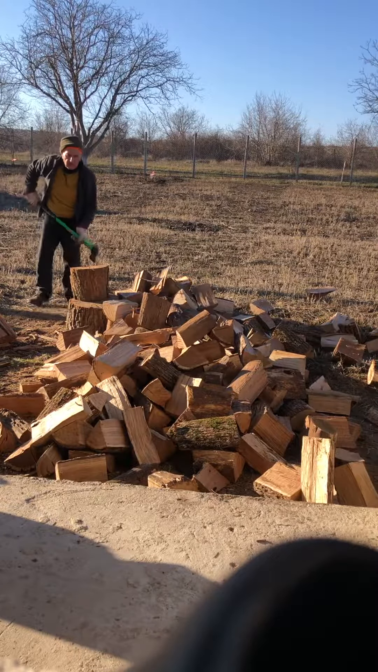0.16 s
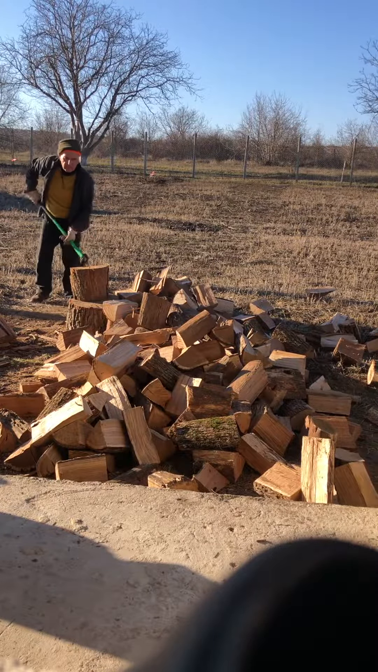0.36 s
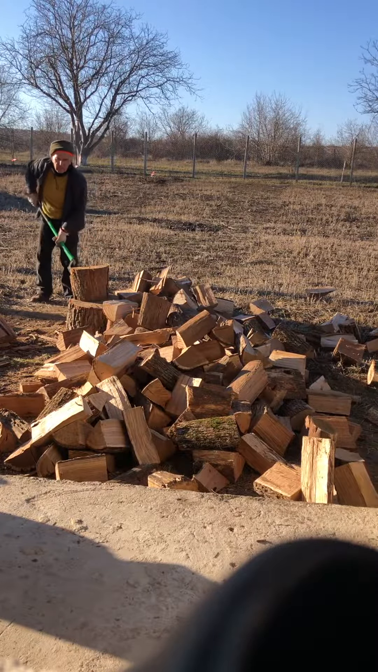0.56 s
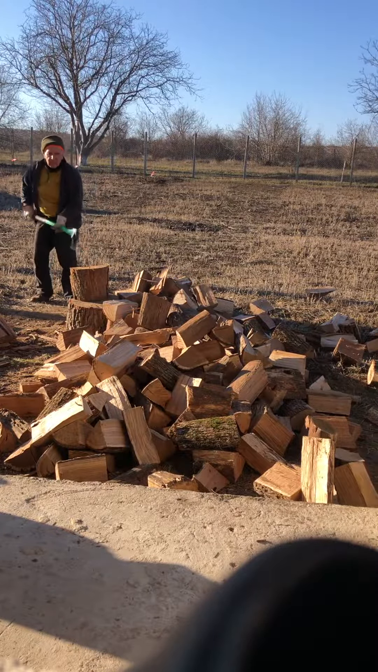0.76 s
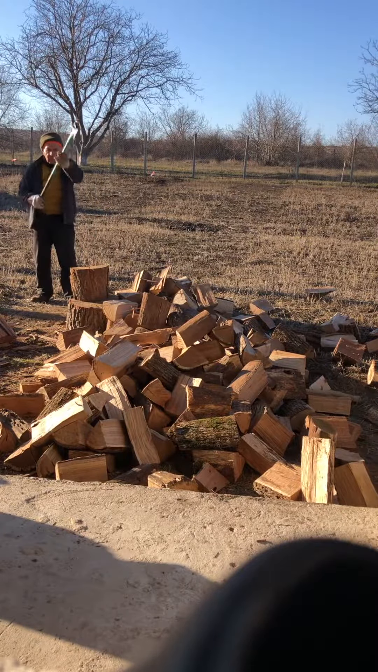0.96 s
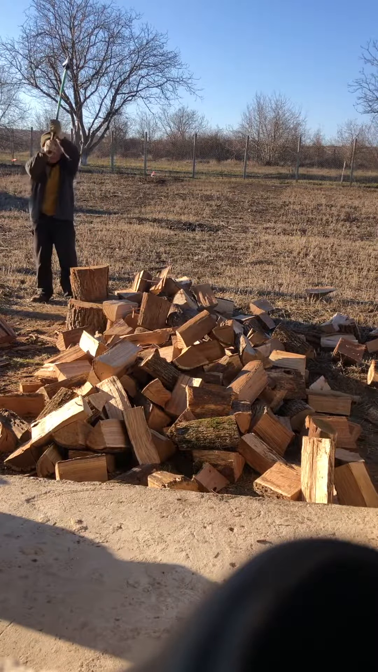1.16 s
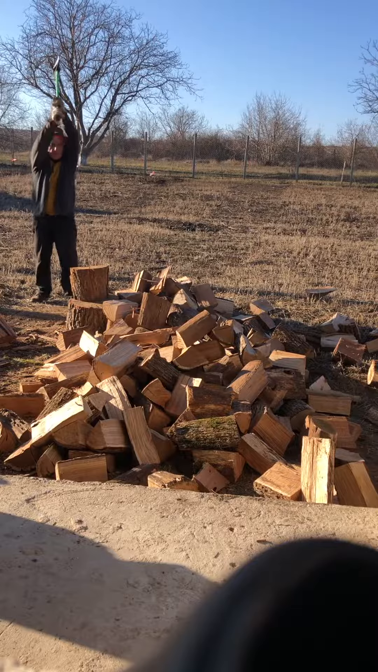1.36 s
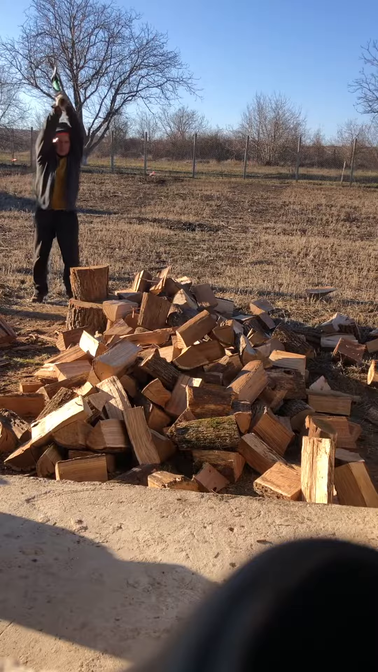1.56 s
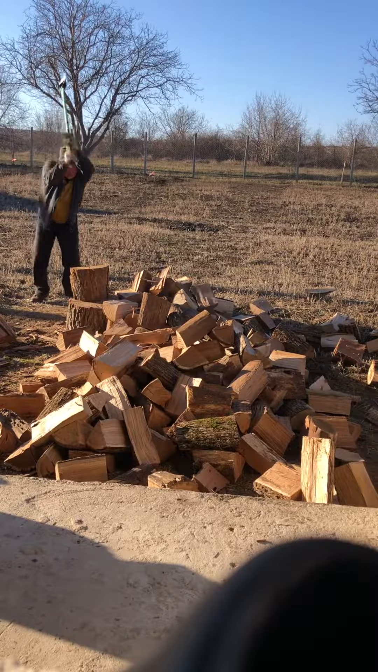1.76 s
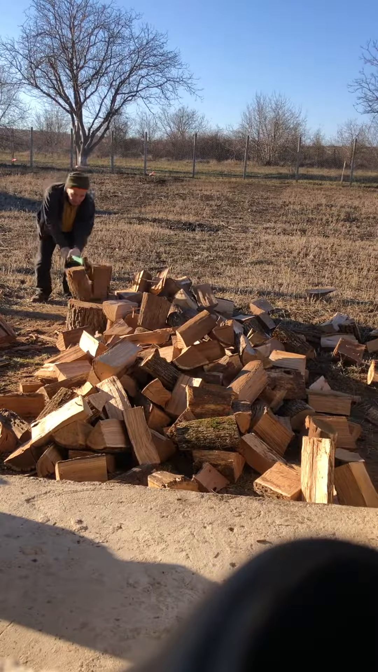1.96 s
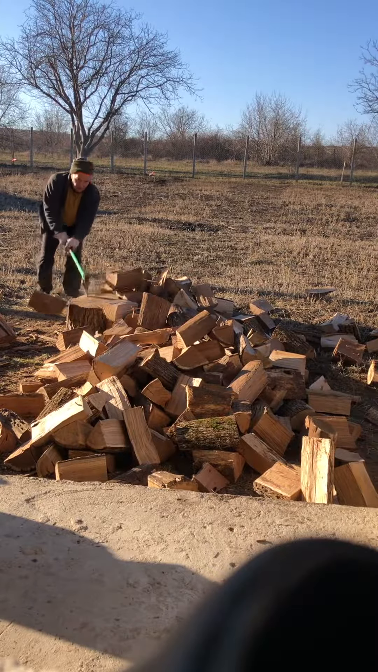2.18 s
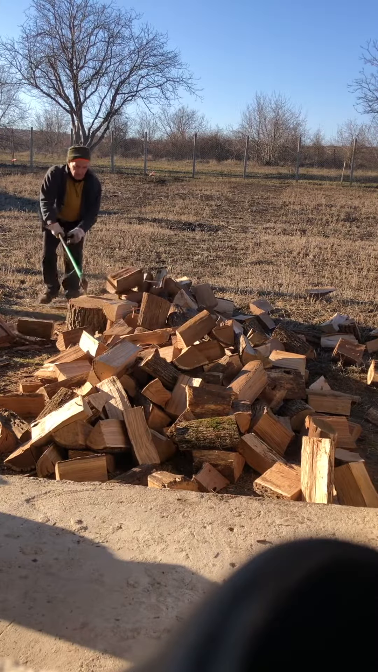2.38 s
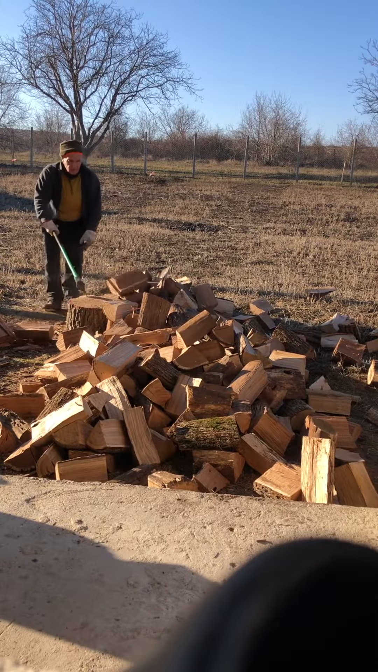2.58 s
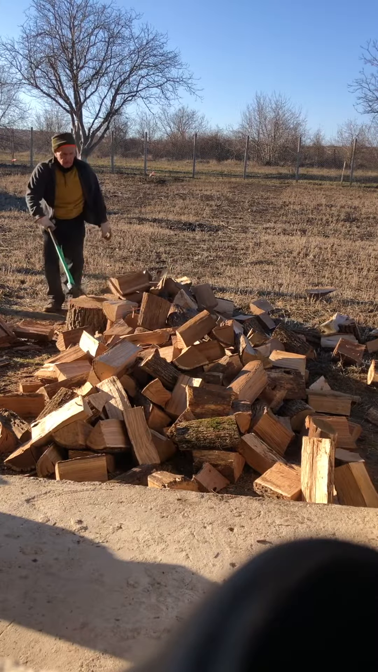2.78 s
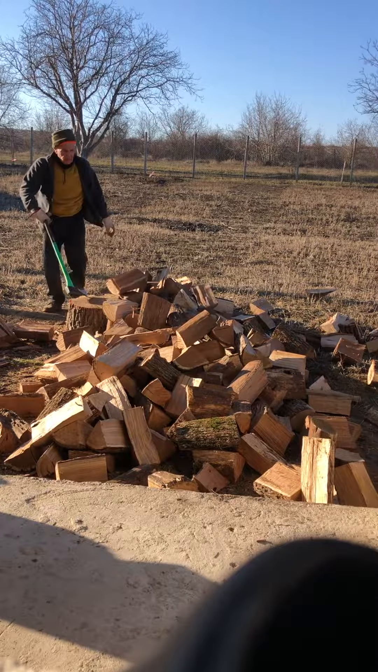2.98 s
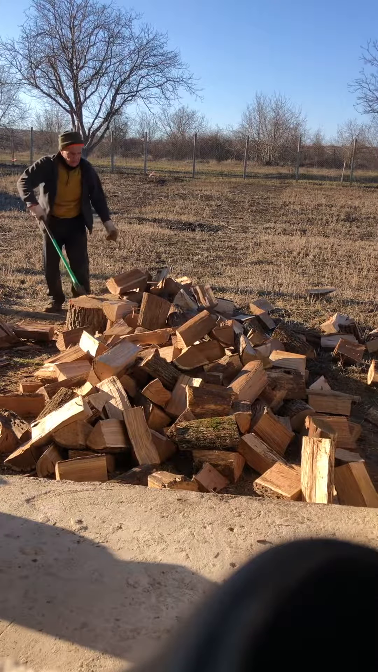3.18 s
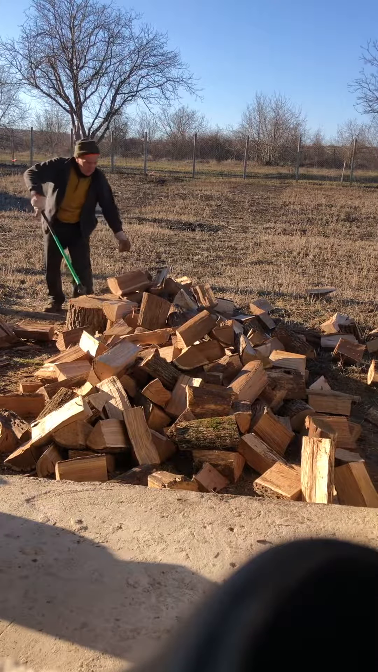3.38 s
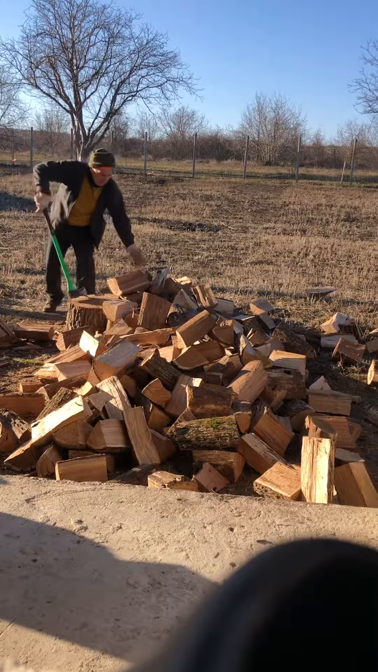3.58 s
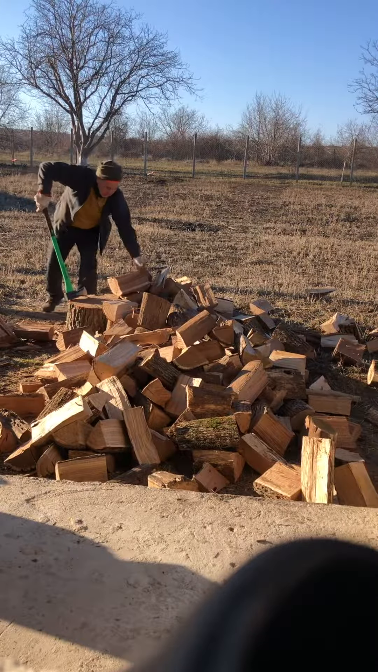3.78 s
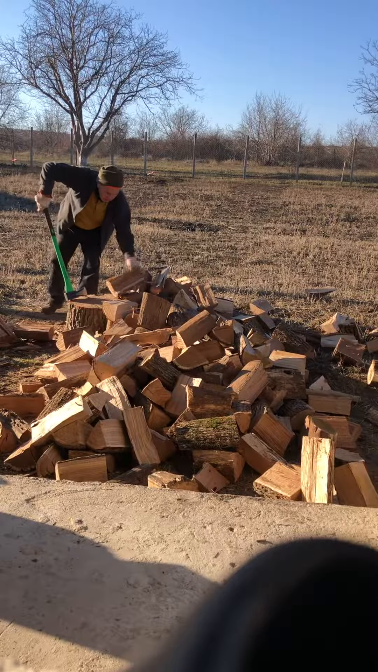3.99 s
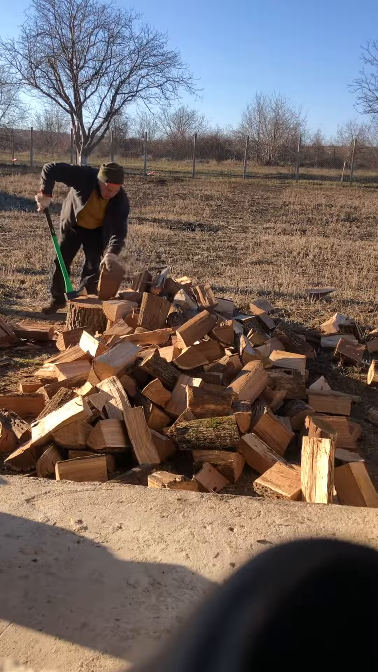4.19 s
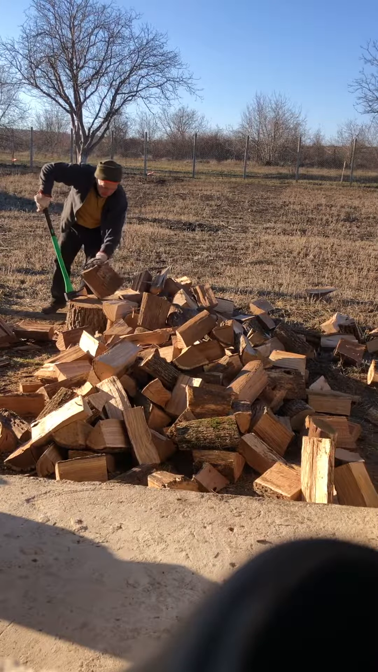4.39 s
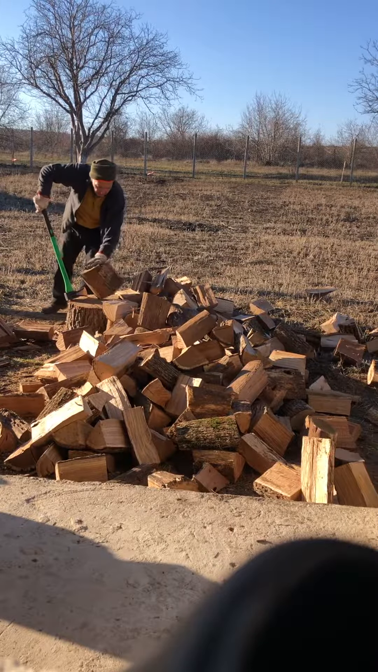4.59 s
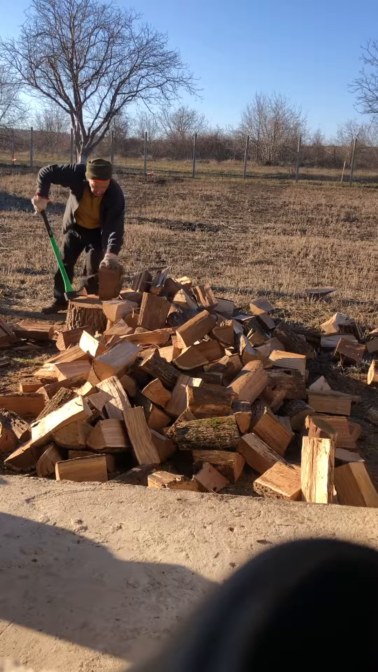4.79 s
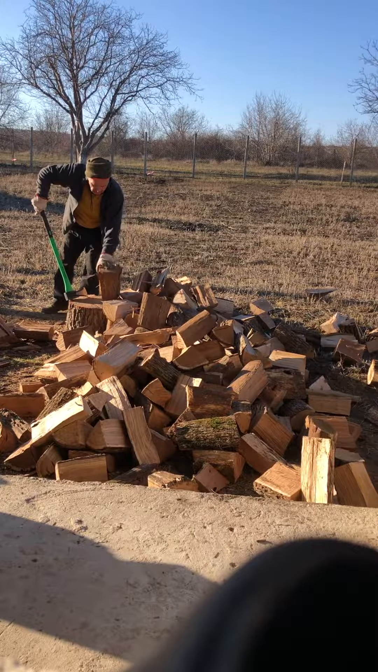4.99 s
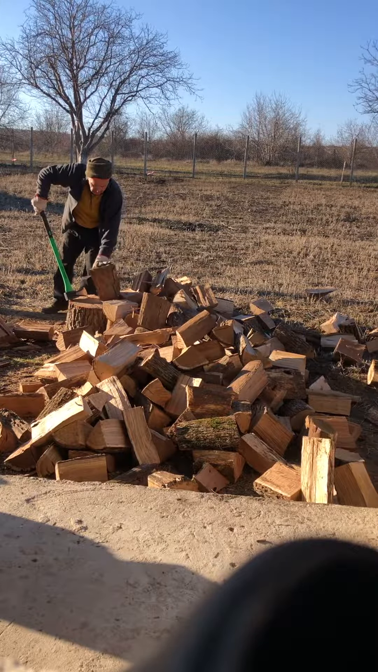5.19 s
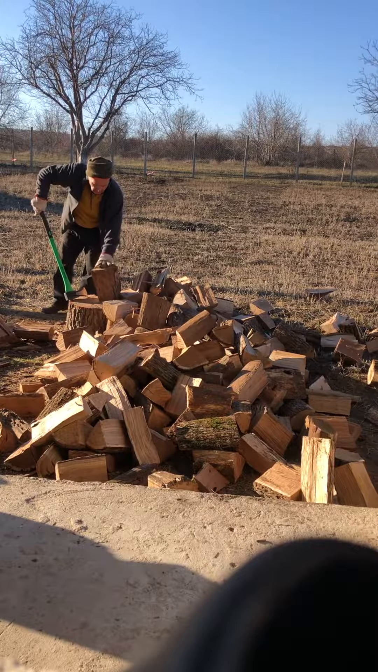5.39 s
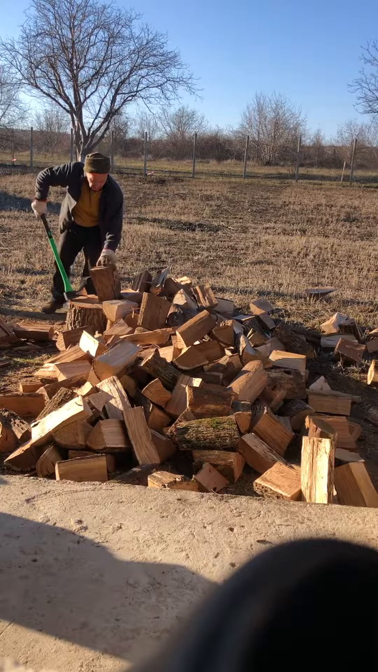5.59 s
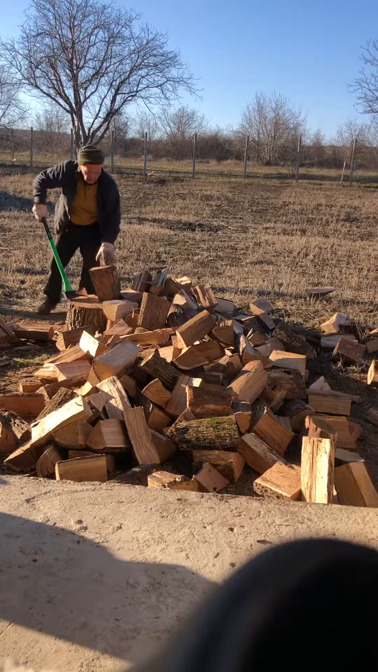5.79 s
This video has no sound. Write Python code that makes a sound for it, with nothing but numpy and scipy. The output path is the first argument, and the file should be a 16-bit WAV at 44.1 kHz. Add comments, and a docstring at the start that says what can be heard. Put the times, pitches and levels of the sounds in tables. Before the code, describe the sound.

An axe splits a log with one sharp, tearing crack in an open field; pieces tumble onto a woodpile amid faint wind and sparrows.

```python
"""Splitting a log in an open field

An axe cracks a log on a chopping block: noise burst, block modes and a storm of fibre snaps with a noise tail.
The halves tumble onto the woodpile as snaps, wood modes and low thumps; chips rattle and splinters tick.
Wind buffets the microphone and a far road hums, both coloured noise; sparrows chirp as sliding sines.
A jacket swishes in swells of noise; the axe head sings in narrow noise bands as it drags over the log."""
import sys
import numpy as np
from scipy import signal
from scipy.io import wavfile

SR = 44100
rng = np.random.default_rng(int(sys.argv[2]) if len(sys.argv) > 2 else 0)


def output_pcm(signal):
    """Save a mono or channel-first signal as 16-bit PCM at the path in sys.argv[1].

    Samples are clipped to [-1, 1] before scaling.
    """
    pcm = np.clip(np.atleast_2d(signal).T, -1, 1) * 32767
    wavfile.write(sys.argv[1], SR, np.round(pcm).astype(np.int16))


N = 257984


def amp(db):
    """Decibels to gain."""
    return 10 ** (np.asarray(db) / 20)


def rms_one(x):
    """Scale to unit rms."""
    return x / np.sqrt(np.mean(x ** 2) + 1e-20)


def at_hz(rows, hz):
    """All columns of a table read on a log-frequency axis."""
    f, *columns = np.transpose(rows)
    return [np.interp(np.log(hz), np.log(f), c) for c in columns]


def level(rows):
    """Gain over time from (s, dB) rows, silent outside them."""
    s, db = np.array(rows)[:, [0, -1]].T
    return amp(np.interp(np.arange(N) / SR, s, db, left=-200, right=-200))


def drift(rate_hz):
    """Slow chance of rms 1: noise through two equal poles, computed every 40 samples."""
    r = np.exp(-80 * np.pi * rate_hz / SR)
    noise = rng.standard_normal(N // 40 + 2002)
    slow = signal.lfilter([1], [1, -2 * r, r * r], noise)[2000:]  # skip the run-in
    return np.interp(np.arange(N) / 40, np.arange(len(slow)), rms_one(slow))


def band(x, low_hz, high_hz):
    """Butterworth band-pass."""
    sos = signal.butter(2, [low_hz, min(high_hz, .47 * SR)], "band", fs=SR, output="sos")
    return signal.sosfilt(sos, x)


def ring(clicks, hz, t60_s):
    """Two-pole resonator: a unit click sets a sine of height 1 ringing."""
    r, w = amp(-60 / (t60_s * SR)), 2 * np.pi * hz / SR
    return signal.lfilter([0, np.sin(w)], [1, -2 * r * np.cos(w), r * r], clicks + 1e-18)


def add(out, s, x):
    """Mix x into out from time s."""
    i = round(s * SR)
    out[i:i + len(x)] += x[:N - i]


def coloured(colour, tones, together_db, own_db, rate_hz):
    """Half-octave noise bands that flicker, scaled to rms 1, plus narrow resonant bands."""
    out, shared, white = 0, drift(rate_hz), rng.standard_normal((2, N))
    lowest_hz, highest_hz = colour[0][0], colour[-1][0]
    edges = lowest_hz * 2 ** np.arange(0, np.log2(highest_hz / lowest_hz) + .5, .5)
    for k, (low, high) in enumerate(zip(edges, edges[1:])):
        db = at_hz(colour, np.sqrt(low * high))[0] + together_db * shared + own_db * drift(rate_hz)
        out = out + amp(db) * band(white[k % 2], low, high)
    out = rms_one(out)
    for hz, width, db in tones:
        tone = rms_one(band(white[0], hz - width / 2, hz + width / 2))
        out = out + amp(db + 2 * drift(0.86)) * tone
    return out


# Far road and field. Each row: time in seconds, level in dB.
ROAD = [(0, -69), (3.0, -66), (5.85, -66.5)]
# Hum spectrum. Each row: frequency in Hz, density in dB per Hz.
ROAD_COLOUR = [(200, -3.5), (350, -4), (570, -0.5), (1080, -3), (1250, -9.5), (3600, -16.5), (16000, -28)]
# Resonant bands in the hum. Each row: centre in Hz, width in Hz, mean level in dB against the hum.
ROAD_DRONES = [(532, 94, -10), (737, 12, -8), (920, 170, -13), (1086, 16, -11), (1760, 250, -15.5)]


def road():
    """Steady broadband hum with narrow bands that slowly waver."""
    return level(ROAD) * coloured(ROAD_COLOUR, ROAD_DRONES, together_db=0.24, own_db=0.5, rate_hz=5.0)


# Gusts at the microphone. Each row: time in seconds, rumble level in dB before the lumps.
WIND = [(0, -60), (.28, -68), (.34, -52), (.55, -44.5), (.67, -63), (.76, -45), (1.12, -52.5),
        (1.36, -63.5), (1.62, -48), (1.8, -62.5), (2.75, -61.5), (3.4, -58), (3.72, -56.5), (3.9, -64),
        (4.1, -49.5), (4.53, -61.5), (4.9, -54.5), (5.85, -61.5)]
# Rumble spectrum. Each row: frequency in Hz, density in dB per Hz.
GUST_COLOUR = [(30, -4.5), (55, 10), (100, 2.5), (200, -11), (400, -32)]
LUMPS_DB, LUMPS_RATE_HZ = 4.0, 7.0  # random lumps within a gust


def wind():
    """Lumpy eddies at the microphone; strong gusts reach higher in pitch."""
    gain = level(WIND) * amp(LUMPS_DB * drift(LUMPS_RATE_HZ))
    rumble = coloured(GUST_COLOUR, [], together_db=3.0, own_db=0.5, rate_hz=59.0)
    pops = rms_one(band(rng.standard_normal(N), 87, 308)) * amp(1.7 * drift(18.67))
    return gain * rumble + gain ** 2 * amp(31.5) * pops


# Arched chirps. Each row: time of the top in seconds, rise in s, fall in s, top in Hz, level in dB.
CHIRPS = [ (1.575, 0.027, 0.015, 3870, -71), (1.9, 0.048, 0.074, 4080, -73), (2.868, .03, 0.033, 4530, -73),
          (2.935, 0.028, 0.029, 3750, -73), (3.055, 0.014, 0.025, 4200, -77.5),
          (3.445, 0.026, 0.034, 4730, -75.5), (3.505, 0.018, 0.027, 3565, -64.5),
          (3.601, 0.002, 0.026, 3300, -72), (3.668, 0.027, 0.027, 3350, -68.5),
          (3.845, .02, 0.025, 3500, -72.5), (3.91, 0.022, 0.041, 5150, -76.5),
          (3.965, 0.015, 0.017, 3660, -70), (4.005, 0.022, 0.035, 3950, -68.5),
          (4.367, 0.0093, .025, 3500, -67.5), (4.62, 0.008, 0.022, 3420, -76),
          (4.804, .012, 0.033, 3590, -70.5), (4.855, 0.018, 0.024, 3300, -71.5),
          (5.255, .003, 0.021, 3780, -68), (5.59, .025, 0.023, 4670, -73), (5.77, 0.0095, 0.023, 3330, -72)]
# Flatter, slurred notes. Each row: time of the top in seconds, rise in s, fall in s, top in Hz, level in dB.
SLURS = [(.065, .005, .05, 3850, -76), (.725, .008, .055, 3900, -75), (1.48, 0.014, 0.034, 4800, -75.5),
         (1.52, 0.0054, 0.026, 4420, -73), (1.585, 0.024, 0.029, 3310, -68.5),
         (1.805, .004, 0.026, 5200, -79), (1.812, 0.0029, 0.033, 4600, -76), (2.9, 0.0093, .022, 4450, -72),
         (2.965, 0.0128, .028, 4340, -75.5), (4.27, .04, .015, 4650, -77.5), (4.3, .035, 0.027, 2850, -71),
         (4.455, .01, .02, 4240, -77)]
RISE_HZ_PER_S, FALL_HZ_PER_S, SLUR_HZ_PER_S = 26000, 44000, 18000
TURN_S = 0.005  # rounding of the top
FAR_FLOCK_DB = -82
TREES_DB, TREES_T60_S = -5, .18


def sparrows():
    """Arched, ragged sine chirps smeared by the trees; a farther flock calls at random."""
    # time, rise, fall, top
    draw = rng.random((110, 4)) * [N / SR - .1, .02, .02, 1100] + [.05, .003, .015, 2900]
    far = [(*row, FAR_FLOCK_DB) for row in draw]
    notes = [(*row, RISE_HZ_PER_S, FALL_HZ_PER_S) for row in CHIRPS + far]
    notes += [(*row, SLUR_HZ_PER_S, SLUR_HZ_PER_S) for row in SLURS]
    out, warble = np.zeros(N), 1 + .012 * drift(70)
    for s, rise, fall, top_hz, db, up, down in notes:
        t = np.arange(-rise * SR, fall * SR) / SR
        hz = top_hz - np.where(t < 0, up, down) * (np.hypot(t, TURN_S) - TURN_S)
        hz = hz * np.roll(warble, -round(s * SR))[:len(t)]
        tone = np.sin(2 * np.pi * np.cumsum(hz) / SR)
        add(out, s - rise, np.sqrt(2) * amp(db) * tone * signal.windows.tukey(len(t), .4))
    ragged = out * amp(3.5 * drift(150))
    t = np.arange(SR // 4) / SR
    scatter = rng.standard_normal(len(t)) * amp(-60 * t / TREES_T60_S)
    smear = signal.fftconvolve(ragged, scatter / np.linalg.norm(scatter))[:N]
    return ragged + amp(TREES_DB) * smear


# Jacket and hands sliding. Each row: time of the loudest point in seconds, swell in s, fade in s, level in dB.
SWISH = [(.36, 0.38, 0.25, -60), (1.181, .19, 0.042, -61.5), (5.65, 0.29, 0.077, -69)]
# Cloth spectrum. Each row: frequency in Hz, density in dB per Hz.
SWISH_COLOUR = [(700, 2), (1600, 5), (2500, -6), (3500, 2.5), (5400, -1), (8500, -7), (16000, -16.5)]
SWISH_SWELL_DB, SWISH_FADE_DB = 13.5, 9.5  # gained over the swell, lost over the fade
SWISH_STOP_S = 0.066  # last drop after the fade


def swish():
    """Each stroke of cloth noise swells to its loudest point, fades and stops."""
    cloth = coloured(SWISH_COLOUR, [], together_db=0.0, own_db=2.0, rate_hz=20.0)
    gain = 0
    for s, swell, fade, db in SWISH:
        end = s + fade
        gain = gain + level([(s - swell, db - SWISH_SWELL_DB), (s, db),
                             (end, db - SWISH_FADE_DB), (end + SWISH_STOP_S, db - 32)])
    return gain * cloth


# Modes of the axe head. Each row: centre in Hz, width in Hz, level in dB.
STEEL = [(4970, 270, 2), (6010, 140, 0), (11600, 500, -10)]
# Drag over the log. Each row: time in seconds, gain in dB.
DRAG = [(.25, -88), (.31, -69.5), (.45, -72.5), (.63, -84)]


def drag():
    """Friction keeps a few modes of the axe head ringing: narrow bands of one noise."""
    white, sound = rng.standard_normal(N), 0
    for hz, width, db in STEEL:
        sound = sound + amp(db) * rms_one(band(white, hz - width / 2, hz + width / 2))
    return level(DRAG) * sound


# Dry ticks of splinters, bark and grass. Each row: start in seconds, level in dB before the band-pass.
TICKS = [(0.7374, -63), (0.813, -61), (1.3365, -53.5), (2.029, -17), (2.034, -25), (3.6849, -62.5),
         (4.0725, -57.5), (4.9215, -58), (5.2497, -58.5), (5.5507, -55.5)]
# Short thin rings. Each row: start in seconds, frequency in Hz, level in dB, t60 in s.
PINGS = [(1.891, 11010, -52.5, 0.077), (5.165, 4530, -61.5, 0.092)]


def ticks():
    """Brief bursts of treble noise and two short decaying sines."""
    out, t = np.zeros(N), np.arange(SR // 5) / SR
    for s, db in TICKS:
        burst = rng.standard_normal(len(t)) * amp(-60 * t / 0.025)
        add(out, s, amp(db) * band(burst, 2300, 8300))
    for s, hz, db, t60 in PINGS:
        attack = np.minimum(500 * t, 1)
        add(out, s, attack * amp(db - 60 * t / t60) * np.sin(2 * np.pi * hz * t))
    return out


RATTLE_FROM_S, RATTLE_T60_S, RATTLE_PER_S, RATTLE_DB = 2.17, 1.1, 140, -54


def rattle():
    """Loose bark and chips tick at random, as noise puffs, while the pile settles."""
    t = np.arange(SR) / SR
    heights = amp(2.7 * np.minimum(rng.exponential(1, SR), 4))
    chips = (rng.random(SR) < RATTLE_PER_S / SR) * heights
    decay = amp(-60 / (0.062 * SR))  # puff t60 0.062 s
    puffs = signal.lfilter([1], [1, -decay], chips + 1e-18) * rng.standard_normal(SR)
    out = np.zeros(N)
    add(out, RATTLE_FROM_S, amp(RATTLE_DB - 60 * t / RATTLE_T60_S) * rms_one(band(puffs, 1150, 8540)))
    return out


# Modes of a piece of firewood. Each row: frequency in Hz, mean level in dB, t60 in s at damping 1.
BILLET = [(235.7, -11, 0.056), (364.3, -10.5, 0.088), (496, -7.5, .08), (565, 0, .11), (628, -9, .07),
          (745, -11.5, 0.1), (900, -10.5, 0.053), (1060, -11, .07), (2034, -12.5, .04)]


def wood(push, damping=1):
    """The modes of a piece of firewood, each struck with its own random strength."""
    strengths_db = rng.normal(0, 2.6, len(BILLET))
    return sum(amp(db + k) * ring(push, hz, t60 / damping) for (hz, db, t60), k in zip(BILLET, strengths_db))


# Wood on wood. Each row: start in seconds, snap level in dB before the band-pass, drive of the ring in dB.
KNOCKS = [(2.179, -23, -57), (2.2073, -36, -45), (2.3055, -23.5, -18.5), (2.3814, -44.5, -40),
          (2.4424, -46, -51), (2.4585, -50, -48.5), (2.5145, -39.5, -40), (2.584, -46, -54),
          (3.2994, -50.5, -71), (5.165, -54.5, -62), (5.6388, -38.5, -58.5)]
# Dull low thumps, loudest where the halves land. Each row: start in seconds, starting level in dB, pitch in Hz.
THUMPS = [(0.46, -39, 266), (0.816, -40.5, 142), (2.329, -25, 94), (2.387, -30, 247), (2.638, -45, 170),
          (2.837, -46, 215), (3.564, -49.5, 226), (4.219, -50.5, 236), (4.791, -48.5, 228),
          (4.901, -43, 231.3), (5.164, -45.5, 240), (5.302, -43.5, 237.3), (5.799, -48.5, 221)]
THUMP_T60_S = 0.064
SNAP_TREBLE_DB = -12  # against its middle
SETTLE_S, SETTLE_DB = 0.033, -4  # chatter after landing: time constant, level before its band-pass


def knocks():
    """Each contact is a dry snap with a rustle of bark and a soft push into the modes of the piece that lands."""
    out, t = np.zeros(N), np.arange(SR // 3) / SR
    for s, snap_db, ring_db in KNOCKS:
        noise = rng.standard_normal(len(t))
        middle = amp(snap_db) * band(noise, 800, 5000)
        treble = amp(snap_db + SNAP_TREBLE_DB) * band(noise, 5000, 17000)
        decay = amp(-60 * t / 0.025) + amp(-11.5 - 60 * t / 0.19)  # snap, then rustle
        snap = (middle + treble) * decay * np.minimum(t / 0.00078, 1)
        push = np.exp(-((t - .003) / 0.00015) ** 2)  # the full weight follows the first touch
        push = push / (0.00031 * SR * np.sqrt(np.pi))  # area about a half
        chatter = rng.standard_normal(len(t)) * np.exp(-t / SETTLE_S) * (t > .003)
        push = push + amp(SETTLE_DB) * band(chatter / np.linalg.norm(chatter), 280, 1700)
        add(out, s, snap + amp(ring_db) * wood(push, damping=1.57))  # it lies on other wood
    for s, db, hz in THUMPS:
        add(out, s, amp(db - 60 * t / THUMP_T60_S) * np.sin(2 * np.pi * hz * t))
    return out


# The blow: start in seconds, level of crack and bite in dB.
BLOW = (1.9735, -4)
# Log and block modes under the blow. Each row: frequency in Hz, level in dB, t60 in s.
BLOCK = [(69.4, -28.5, 0.59), (152.5, -20.5, .28), (463, -15.5, 0.29), (575, -17.5, 0.35), (872, -21, 0.16),
         (1730, -19, 0.12)]
# The tearing log. Each row: frequency in Hz, tear level in dB, tear t60 in s, level of the field's answer
# in dB, answer t60 in s.
SPLIT = [(60, -36, 0.51, -42.5, 1.6), (233, -34, .4, -43.5, 1.2), (521, -20.5, 0.26, -39.5, 0.8),
         (1740, -26.5, .4, -41.5, .75), (4040, -31, .24, -39.5, 0.54), (7900, -29.5, .2, -48, 0.5),
         (14000, -35.5, 0.16, -61, .4)]


def axe():
    """The edge bites with one crack, then fibres tear in dense snaps that ring the log and die band by band."""
    (s, blow_db), t = BLOW, np.arange(SR) / SR
    crack = band(rng.standard_normal(SR) * np.exp(-(t / .0028) ** 4), 1600, 6900)
    bite = np.exp(-(t / .0033) ** 4) * np.sin(2 * np.pi * 900 * t)  # the shove of the edge into the grain
    sound = amp(blow_db) * (crack + 0.7 * bite)
    for hz, db, t60 in BLOCK:
        attack = np.minimum(t * hz / 1.1, 1)
        sound += amp(db - 60 * t / t60) * np.sin(2 * np.pi * hz * t) * attack

    heights = amp(2.1 * np.minimum(rng.exponential(1, SR), 4))
    snaps = (rng.random(SR) < 4000 / SR) * heights * rng.choice([-1, 1], SR)  # 4000 a second
    clumps = amp(1.8 * drift(60)[:SR])
    snaps *= clumps + 0.43 * np.exp(-((t - .023) / 0.0033) ** 2)  # extra as the log opens
    snaps *= 1 + 0.75 * np.exp(-((t - .078) / 0.025) ** 2)  # the last fibres let go
    sound += amp(-40) * wood(snaps * amp(-60 * t / 0.16), damping=0.76)  # rings longer than at damping 1

    answer, edges = rng.standard_normal(SR), 45 * 2 ** np.arange(0, 9, .5)
    for k, (low, high) in enumerate(zip(edges, edges[1:])):
        hz = np.sqrt(low * high)
        db, t60, far_db, far_t60 = at_hz(SPLIT, hz)
        rise = 1 - np.exp(-t * hz / 0.33)  # lows build up later
        tear = rms_one(band(snaps, low, high)) * amp(db - 60 * t / t60)
        far = rms_one(band(answer, low, high)) * amp(far_db - 60 * t / far_t60)
        sound += (-1) ** k * rise * (tear + far)
    out = np.zeros(N)
    add(out, s, sound)
    return out


def scene():
    """The sum of all sources, one channel."""
    background = road() + wind() + sparrows()
    handling = swish() + drag() + ticks()
    return (background + handling + rattle() + knocks() + axe())[None]


CUTOFF_HZ = 15900


def record(dry):
    """The microphone drops the deepest bass, rounds the peaks and cuts the top."""
    x = signal.sosfilt(signal.butter(2, 48, "high", fs=SR, output="sos"), dry)
    x = 1.308 * np.tanh(x / 1.283)
    return signal.sosfilt(signal.ellip(10, .5, 70, CUTOFF_HZ, fs=SR, output="sos"), x)


dry = scene()
out = record(dry)
output_pcm(out)
```